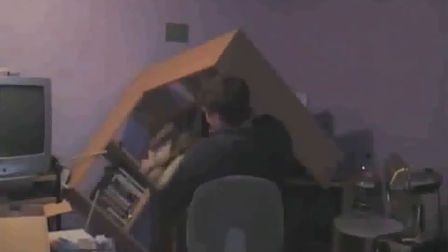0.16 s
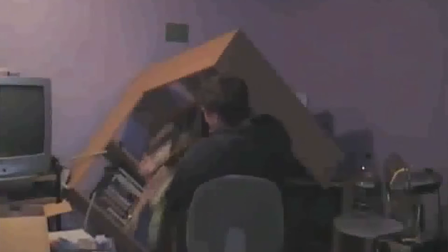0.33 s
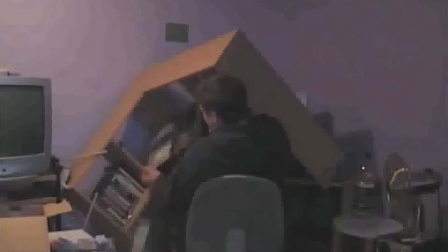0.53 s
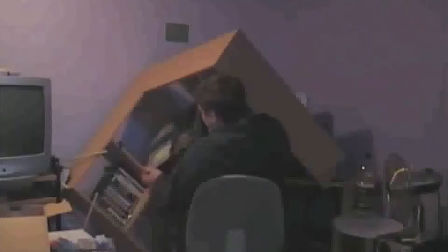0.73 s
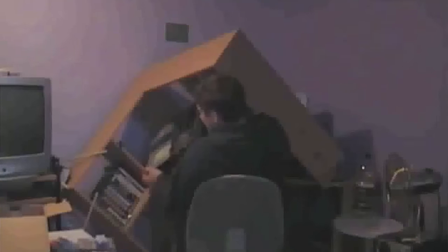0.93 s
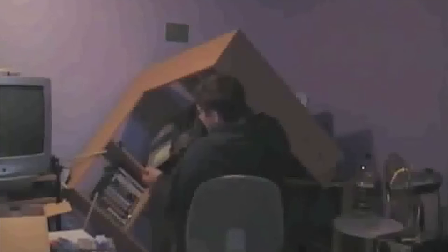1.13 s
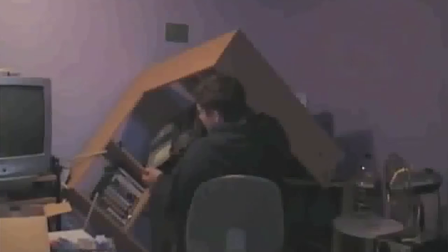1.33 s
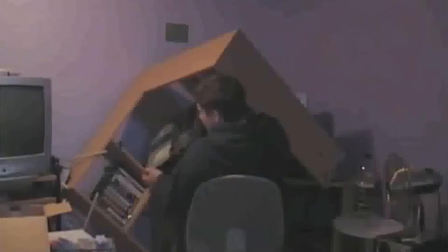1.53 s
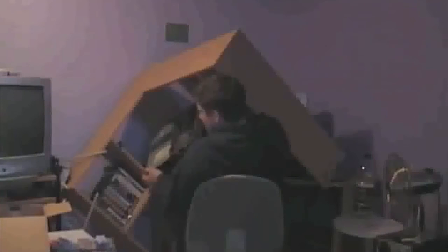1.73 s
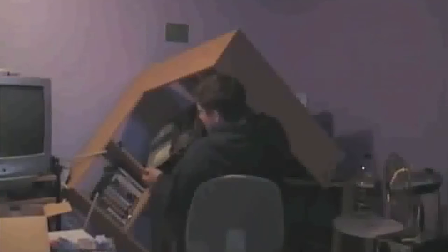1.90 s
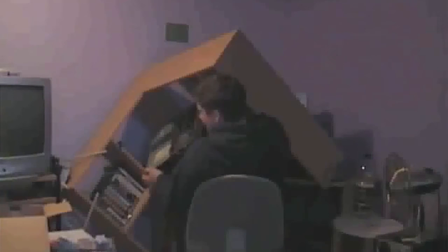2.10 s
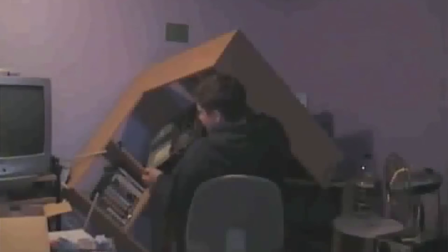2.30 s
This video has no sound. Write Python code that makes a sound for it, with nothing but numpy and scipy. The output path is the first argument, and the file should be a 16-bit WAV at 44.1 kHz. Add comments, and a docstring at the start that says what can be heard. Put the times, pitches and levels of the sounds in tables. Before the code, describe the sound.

Wooden desk hutch collapses in a clattering tumble of boards, lands hard, then light knocks fade

```python
"""Wooden desk hutch collapsing

In a small room boards slide, knock and clatter, one groans, the carcass lands hard and light knocks follow.
Each blow is a short cluster of contacts that rings the wooden panels and the room.
After a lull a board starts to rub again. Below it all lie a room murmur, hiss and a faint motor whine.
A camcorder hears it: shallow notches against its own motor hum, and no sound at the very top."""
import sys
import numpy as np
from scipy import signal
from scipy.fft import rfft, irfft, next_fast_len
from scipy.io import wavfile
from scipy.ndimage import uniform_filter1d

SR = 44100
rng = np.random.default_rng(int(sys.argv[2]) if len(sys.argv) > 2 else 0)


def file_out(sig):
    """Save sig as 16-bit WAV at sys.argv[1]."""
    # one column per channel
    cols = np.atleast_2d(sig).T
    # limit, then scale
    lim = np.clip(cols, -1, 1)
    pcm = np.round(lim * 32767).astype(np.int16)
    wavfile.write(sys.argv[1], SR, pcm)


N = 108133  # length of the scene in samples


def undb(db):
    """Turn decibels into a gain."""
    return 10 ** (np.asarray(db) / 20)


def unit(x):
    """Scale a sound to an rms level of 1."""
    return x / np.sqrt(np.mean(x ** 2) + 1e-18)


def decay(t, t60):
    """Fade that has dropped by 60 dB after t60 seconds."""
    return np.exp(-np.log(1000) * t / t60)


def level_curve(rows):
    """Draw a gain over time through points of seconds and dB."""
    seconds, db = np.array(rows).T
    return undb(np.interp(np.arange(N) / SR, seconds, db))


def colour(x, points):
    """Filter through points of Hz and dB, with no sound ahead of its cause (minimum phase)."""
    n = next_fast_len(x.shape[-1] + 4096, real=True)
    n += n % 2
    hz, db = np.array(points, float).T
    bins_hz = np.arange(n // 2 + 1) * SR / n
    gain = undb(np.interp(np.log(bins_hz + 1), np.log(hz), db))
    # folding the cepstrum forward in time gives the minimum phase
    cepstrum = irfft(np.log(gain))
    cepstrum[1:n // 2] *= 2
    cepstrum[n // 2 + 1:] = 0
    response = np.exp(rfft(cepstrum))
    return irfft(rfft(x, n) * response)[..., :x.shape[-1]]


def at_level(x, db):
    """Set the rms level of the loudest 30 ms of a sound."""
    power = uniform_filter1d(np.mean(x ** 2, axis=0), int(.03 * SR), mode="constant")
    return x * undb(db) / np.sqrt(power.max() + 1e-18)


def add(out, x, start):
    """Mix a sound in at a time in seconds."""
    i = int(np.clip(start * SR, 0, N - 1))
    out[:, i:i + x.shape[1]] += x[:, :N - i]


def wander(rate):
    """Move smoothly between random values, with a new value rate times a second."""
    steps = np.clip(rng.standard_normal(1024), -1.5, 1.5)
    return np.interp(np.arange(N) / SR * rate, np.arange(len(steps)), steps)


def diffuse(count, width):
    """Make stereo noise from a shared middle and a side part that differs between the ears."""
    mid, side = rng.standard_normal((2, count))
    return mid + colour(side, width) * np.array([[1], [-1]])


# Stereo width of the reflections. Each row: frequency in Hz, side level relative to the middle in dB.
REFLECTION_WIDTH = [(60, -14.5), (250, -16), (500, -19.5), (1000, -11.5), (2000, -12), (4000, -6),
                    (10000, -4)]
ROOM_BUILD_S = 0.0056  # time constant of the build-up
EARLY_DB, EARLY_S = 5.5, 0.0086  # extra early sound and its time constant
SPARSE_DB, SPARSE_S = 8, 0.02  # early unevenness and its time constant


def reflections():
    """Uneven early reflections thicken into a smooth tail, before any decay."""
    t = np.arange(SR // 2) / SR
    build_up = 1 - np.exp(-t / ROOM_BUILD_S)
    early = 1 + undb(EARLY_DB) * np.exp(-t / EARLY_S)
    spread = np.log(undb(SPARSE_DB)) * np.exp(-t / SPARSE_S)
    # each random wall strength is held for 20 samples
    walls = np.clip(rng.standard_normal(len(t) // 20 + 1), -2, 2)
    walls = np.repeat(walls, 20)[:len(t)]
    unevenness = np.exp(spread * walls - spread ** 2)
    return diffuse(len(t), REFLECTION_WIDTH) * unevenness * build_up * early


DIRECT = 14.2  # gain of the direct sound beside the reflections


def room(paths, t60):
    """The direct sound comes first, then the reflections die away."""
    response = paths * decay(np.arange(paths.shape[1]) / SR, t60)
    response[:, 0] += DIRECT
    return response


def smear(dry):
    """The room returns a rubbing sound in stereo, at about the same power."""
    response = room(reflections(), .28)  # t60 in seconds
    response /= np.sqrt(np.sum(response ** 2) / 2)
    return signal.fftconvolve(dry[None], response, axes=1)[:, :N]


# Low murmur of the room. Each row: frequency in Hz, relative level in dB per Hz.
MURMUR_COLOUR = [(20, -31.5), (48, -4.5), (80, -1), (115, -6), (200, -4.5), (290, 0), (400, -3), (520, -8),
                 (900, -11), (1400, -23), (3000, -49.5)]
# Slow swell of murmur and whine. Each row: time in seconds, murmur level in dB.
MURMUR_LEVEL = [(1.35, -60.5), (1.7, -59), (1.95, -58.5), (2.08, -54.5), (2.3, -54)]
# Hum and whine of the motor. Each row: frequency in Hz, sine peak in dB relative to the murmur's rms.
MOTOR_WHINE = [(312, -4.5), (958, -14.5), (3260, -21.5), (4500, -23.5), (6745, -9.5), (9512, -28),
               (10191, -23)]
# Steady colour of the hiss. Each row: frequency in Hz, relative level in dB per Hz.
HISS_COLOUR = [(300, -26.5), (700, -10), (1400, 2.5), (2400, 0), (3250, 0), (3800, -2), (4900, -2.5),
               (5600, -0.5), (6600, 0), (7500, -7), (10000, -7), (11400, -15), (12500, -34.5)]
# Slow swell of the hiss. Each row: time in seconds, level in dB.
HISS_SWELL = [(1.35, -65), (1.7, -63), (2.0, -61), (2.25, -59)]
# Stereo width of murmur and hiss. Each row: frequency in Hz, side level relative to the middle in dB.
BACKGROUND_WIDTH = [(60, -8.5), (110, -5), (200, -3.5), (370, -8), (670, -5.5), (1220, -6), (2230, -7.5),
                    (4080, -4), (7450, -2), (13600, 3)]


def room_tone():
    """Coloured noise makes murmur and hiss, steady sines make the motor; all swell slowly in the quiet."""
    t = np.arange(N) / SR
    whine = sum(undb(db) * np.sin(2 * np.pi * hz * t) for hz, db in MOTOR_WHINE)
    murmur = unit(colour(diffuse(N, BACKGROUND_WIDTH), MURMUR_COLOUR))
    hiss = unit(colour(diffuse(N, BACKGROUND_WIDTH), HISS_COLOUR))
    return (murmur + whine) * level_curve(MURMUR_LEVEL) + hiss * level_curve(HISS_SWELL)


SLIPS_PER_S, SLIP_SCATTER_DB = 800, 6.5  # average rate of the clicks, spread of their strength
CATCH_PER_S, CATCH_DB = 45, 2.5  # rate and depth of the catching and letting go


def scrape(level, spectrum):
    """Stick and slip: dense uneven clicks that catch and let go, coloured by the wood and smeared by the room."""
    happens = rng.random(N) < SLIPS_PER_S / SR
    sign = rng.choice([-1, 1], N)
    strength = undb(SLIP_SCATTER_DB * np.clip(rng.standard_normal(N), -2, 2))
    slips = happens * sign * strength
    catch = undb(CATCH_DB * wander(CATCH_PER_S))
    rubbing = unit(colour(slips, spectrum) * catch)
    return smear(rubbing * level_curve(level))


# A board starts to rub along the desk again. Each row: time in seconds, level in dB.
RUB_LEVEL = [(2.0, -87.5), (2.26, -67), (2.33, -49), (2.38, -44), (2.402, -44), (2.45, -33)]
# Colour of that rubbing. Each row: frequency in Hz, relative level in dB per Hz.
RUB_SPECTRUM = [(60, -27.5), (180, -19.5), (310, 9.5), (500, -7), (690, 0), (920, -4.5), (1250, -5.5),
                (1800, -26), (2500, -26), (3000, -17), (4100, -29), (5250, -15), (6000, -24.5),
                (9000, -32.5), (12000, -55)]


def rub():
    """One board rubs by stick and slip, rising out of the lull at the end."""
    return scrape(RUB_LEVEL, RUB_SPECTRUM)


# Boards and loose items scraping. Each row: time in seconds, level in dB.
SLIDE_LEVEL = [(0, -27.5), (.15, -24.5), (.27, -26.5), (.39, -30), (.43, -35.5), (.56, -44.5), (.72, -46),
               (.78, -33), (.87, -30.5), (.94, -49), (1.1, -47.5), (1.3, -100)]
# Colour of the scraping. Each row: frequency in Hz, relative level in dB.
SLIDE_SPECTRUM = [(40, -30.5), (120, -14.5), (190, -8), (300, -3), (620, 5.5), (1000, -7.5), (2000, -10.5),
                  (4500, -9), (8000, -22.5), (13000, -30)]


def slide():
    """Boards and loose items scrape by stick and slip during the collapse."""
    return scrape(SLIDE_LEVEL, SLIDE_SPECTRUM)


# A board groans as it slips. Each row: time in seconds, pitch in Hz before the jitter,
# level in dB before the flutter.
GROAN_PATH = [(.578, 690, -48), (.592, 692, -24), (.618, 684, -32), (.64, 694, -24.5), (.66, 672, -29),
              (.678, 640, -31), (.70, 630, -60)]
GROAN_JITTER, GROAN_FLUTTER_DB, GROAN_WANDER_PER_S = .014, 2, 220  # pitch share, level, rate
GROAN_OVERTONE_DB, GROAN_ROOM_DB = -21.5, -29  # relative to the main tone, and to the dry groan


def groan():
    """Stick and slip locks onto the shelf's note: a short uneven tone that sags as the board lets go."""
    t = np.arange(N) / SR
    when, hz, db = np.array(GROAN_PATH).T
    pitch = np.interp(t, when, hz) * (1 + GROAN_JITTER * wander(GROAN_WANDER_PER_S))
    phase = 2 * np.pi * np.cumsum(pitch) / SR
    level = undb(np.interp(t, when, db) + GROAN_FLUTTER_DB * wander(GROAN_WANDER_PER_S))
    level *= (t > when[0]) & (t < when[-1])
    tone = unit(np.sin(phase) + undb(GROAN_OVERTONE_DB) * np.sin(2 * phase))
    dry = tone * level
    return dry + undb(GROAN_ROOM_DB) * smear(dry)


# The corners of the carcass strike the desk in turn. Each row: start in seconds,
# level of the loudest 30 ms in dB.
CORNER_STRIKES = [(.675, -26), (.681, -20.5), (.689, -18.5), (.699, -19.5)]
# Notes of the desk top, heavily damped under the load. Each row: frequency in Hz, relative level in dB,
# time to fade by 60 dB in seconds.
DESK_MODES = [(280, -9, 0.12), (350, 0, 0.083), (451, -4, .045), (569, 4, 0.06), (654, 4.5, 0.062)]


def landing():
    """The weight comes down corner by corner: each strike is a short, solid thud of the desk top."""
    t = np.arange(SR // 4) / SR
    thud = sum(undb(db) * decay(t, t60) * np.sin(2 * np.pi * hz * t) for hz, db, t60 in DESK_MODES)
    thud = thud * (1 - np.exp(-t / .0015))  # soft start
    out = np.zeros((2, N))
    for start, db in CORNER_STRIKES:
        add(out, at_level(thud[None], db), start)
    return out


CONTACTS_PER_S, CONTACT_SCATTER_DB = 420, 3.5  # rate of contacts, spread of their strength
FIRST_CONTACT, CLATTER_FALL_DB = 0.84, 6  # force of the first contact, weakening over the clatter


def contacts(length, count=40):
    """A first touch, then quick contacts of uneven force that tend to weaken over the clatter."""
    when, size, sign = rng.random(count), rng.standard_normal(count), rng.choice([-1, 1], count)
    used = int(np.clip(length * CONTACTS_PER_S, 1, count))
    force = np.zeros(int(length * SR) + 1)
    places = (np.arange(used) + when[:used]) / used  # 0 to 1 along the clatter
    strength = undb(CONTACT_SCATTER_DB * size[:used] - CLATTER_FALL_DB * places)
    force[(places * len(force)).astype(int)] = sign[:used] * strength
    force[0] = FIRST_CONTACT
    return force


MODE_SCATTER_DB, MODE_DETUNE = 2.14, 0.0051  # random spread of level, and of pitch as a share
MODE_PAN_DB = 2  # random spread of the level difference between the ears
RING_RISE_S = .004  # averaged with the clatter length to give the rise time


def ring(modes, length):
    """Panel notes build up during the clatter; each blow shares them out differently, also between the ears."""
    t = np.arange(SR // 2) / SR
    out = np.zeros((2, len(t)))
    scatter, turns = rng.standard_normal((len(modes), 3)), rng.random(len(modes))
    for (hz, db, t60), (louder, sharper, sideways), turn in zip(modes, scatter, turns):
        pan_db = MODE_PAN_DB * sideways * np.array([[1], [-1]]) / 2
        gain = undb(db + MODE_SCATTER_DB * louder + pan_db)
        pitch = hz * (1 + MODE_DETUNE * sharper)
        out += gain * (decay(t, t60) * np.sin(2 * np.pi * (pitch * t + turn)))
    rise_s = (RING_RISE_S + length) / 2
    return out * np.minimum(t / rise_s, 1)


# Blows of boards and items. Each row: start in seconds, length of the clatter in seconds, then levels
# of the loudest 30 ms in dB: boom, thud, knock, clack and crack (all five before the contact colour),
# carcass ring, shelf ring.
COLLAPSE_BLOWS = [ (.000, 0.017, -54, -25.5, -20.5, -28.5, -32, -30, -34),
                  (.048, 0.021, -65, -29.5, -21.5, -22.5, -31, -22.5, -25),
                  (.066, 0.026, -60.5, -37.5, -22, -35.5, -30.5, -19, -33),
                  (.125, 0.019, -46, -35.5, -35.5, -34.5, -26, -36.5, -35.5),
                  (.158, .015, -44.5, -25, -27.5, -29, -19.5, -28, -45),
                  (.195, .030, -59.5, -31.5, -30, -38.5, -52.5, -33, -31),
                  (.235, .035, -53, -39.5, -37, -24.5, -27, -27.5, -40.5),
                  (0.281, 0.011, -47.5, -31, -26.5, -18, -17, -24.5, -36),
                  (0.319, .022, -48.5, -35.5, -36, -42, -42, -42, -38.5),
                  (.358, .014, -65, -34, -34.5, -32, -34.5, -36.5, -36),
                  (.414, 0.0071, -57.5, -35, -21, -20, -18, -36, -20.5),
                  (.582, 0.012, -66.5, -43, -33.5, -29.5, -33.5, -48.5, -39),
                  (.622, 0.026, -64, -40.5, -36, -26.5, -20, -51, -50),
                  (.669, .012, -41, -18.5, -28, -21, -22.5, -24, -40),
                  (.682, 0.006, -45.5, -27, -26.5, -20, -25, -20.5, -35),
                  (.789, .022, -41, -35, -34, -19, -25.5, -40.5, -51),
                  (0.847, .024, -45, -33.5, -30.5, -27.5, -44, -35, -34),
                  (.888, .015, -70, -29.5, -30, -35, -40, -35.5, -35.5),
                  (1.01, 0.012, -55.5, -40, -37, -43.5, -46, -35, -36.5),
                  (1.115, .022, -52.5, -43, -44.5, -34.5, -43, -45.5, -46),
                  (1.190, .030, -58, -48.5, -48, -48.5, -60, -57.5, -60)]
# Boom, thud, knock, clack and crack, in this order. Each row: low edge in Hz, high edge in Hz,
# time for the room to fade by 60 dB in seconds.
CONTACT_REGISTERS = [(48.4, 110, 0.36), (230, 488, 0.35), (466.5, 880, 0.31), (970, 2940, 0.37),
                     (3410, 8300, 0.27)]
# Colour shared by all contacts. Each row: frequency in Hz, gain in dB.
CONTACT_TINT = [(60, -3), (300, -2), (650, 1), (1000, -1), (2000, -6.5), (3200, -8), (5000, -5.5),
                (7500, -7), (10000, -2), (13000, 4.5)]
# Notes of the carcass, before the random spread. Each row: frequency in Hz, relative level in dB,
# time to fade by 60 dB in seconds.
CARCASS_MODES = [(182.5, -18.5, 1), (223, -20.5, .6), (279.1, -9.5, .3), (351.7, -6, .28),
                 (392.8, -7.5, 0.31), (487.3, -4, 0.097), (535.3, 5, .2), (568.5, 3, 0.24), (642, 5, 0.17),
                 (694, -7, 0.066), (790, -9, 0.13), (1103, -14.5, .25), (1289, -8, 0.11),
                 (1388, -8.5, 0.25), (1620, -20, 0.37), (2910, -15.5, 0.24)]
# Notes of the shelf, before the random spread. Each row: frequency in Hz, relative level in dB,
# time to fade by 60 dB in seconds.
SHELF_MODES = [(604, -13.5, 0.25), (684, 7, 0.29), (766, -5, 0.23), (785, -13, 0.23), (934, -2.5, 0.13),
               (1170, -7.5, 0.18), (1366, -12, 0.11), (2530, -26.5, 0.28)]


def blows():
    """Boards and items hit each other: five registers of contact sound in the room, and two ringing parts."""
    hits, rings = np.zeros((2, 2, N))
    for start, length, *levels, carcass_db, shelf_db in COLLAPSE_BLOWS:
        force = contacts(length)[None]
        paths = reflections()
        for (low, high, t60), db in zip(CONTACT_REGISTERS, levels):
            band = signal.butter(3, [low, high], "band", fs=SR, output="sos")
            in_room = signal.fftconvolve(room(paths, t60), force, axes=1)
            add(hits, at_level(signal.sosfilt(band, in_room), db), start)
        add(rings, at_level(ring(CARCASS_MODES, length), carcass_db), start)
        add(rings, at_level(ring(SHELF_MODES, length), shelf_db), start)
    return colour(hits, CONTACT_TINT) + rings


# The left port is less sensitive low down. Each row: frequency in Hz, left relative to right in dB.
LEFT_BALANCE = [(60, -0.5), (200, -1.5), (400, -2.5), (700, -2), (1200, 0.5), (5000, -0.55), (13000, -0.5)]


def scene():
    """The collapse plays over the room tone, its low notes leaning to the right."""
    left, right = room_tone() + rub() + slide() + groan() + landing() + blows()
    return np.array([colour(left, LEFT_BALANCE), right])


COMB_HZ = 149.87  # motor rate
COMB_ZERO, COMB_POLE = 0.65, 0.42  # the closer together, the shallower the notches
TOP_HZ = 13000  # upper limit of the sound


def record(dry):
    """A comb filter dips at every multiple of the motor rate, then a steep filter cuts the top."""
    n = 2 * next_fast_len(N, real=True)
    # a delay of one motor period, as a turn of phase
    turn = np.exp(-2j * np.pi * np.arange(n // 2 + 1) * SR / n / COMB_HZ)
    comb = (1 - COMB_ZERO * turn) / (1 - COMB_POLE * turn)
    notched = irfft(rfft(dry, n) * comb)[:, :N]
    top_cut = signal.ellip(8, .2, 70, TOP_HZ, fs=SR, output="sos")
    return signal.sosfilt(top_cut, notched)


dry = scene()
out = record(dry)
file_out(out)
```